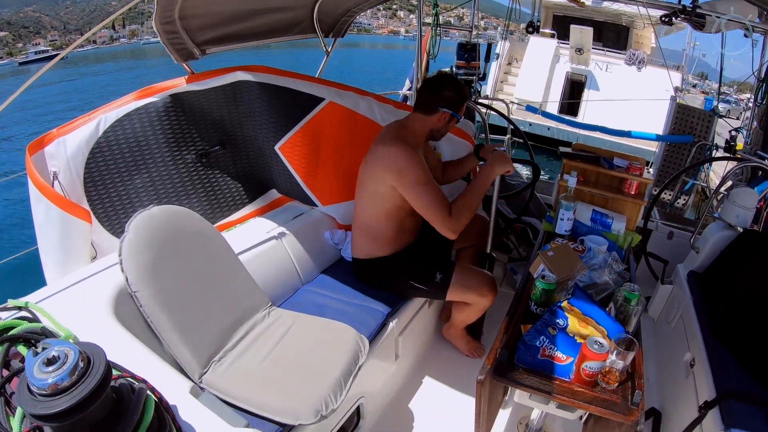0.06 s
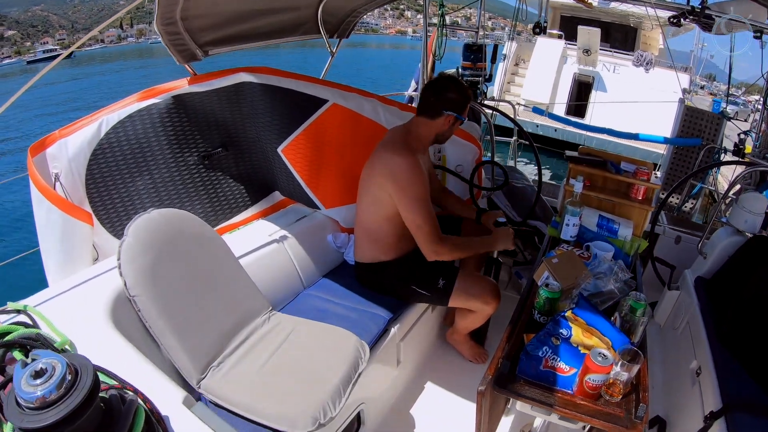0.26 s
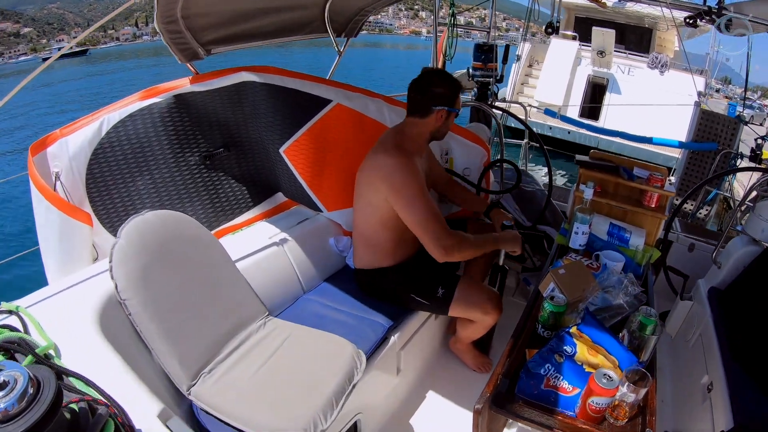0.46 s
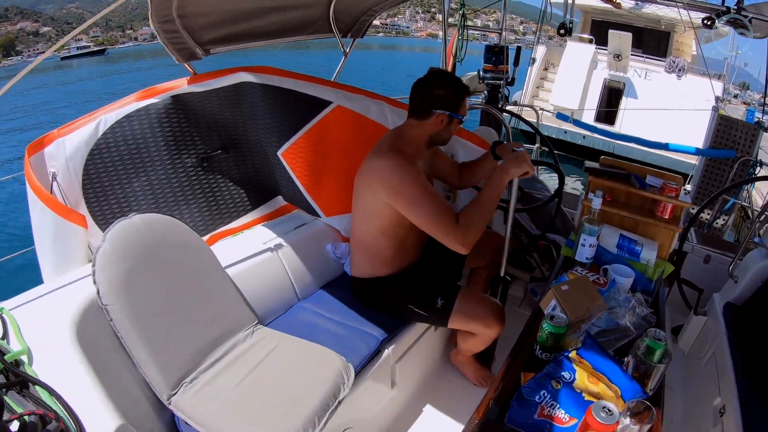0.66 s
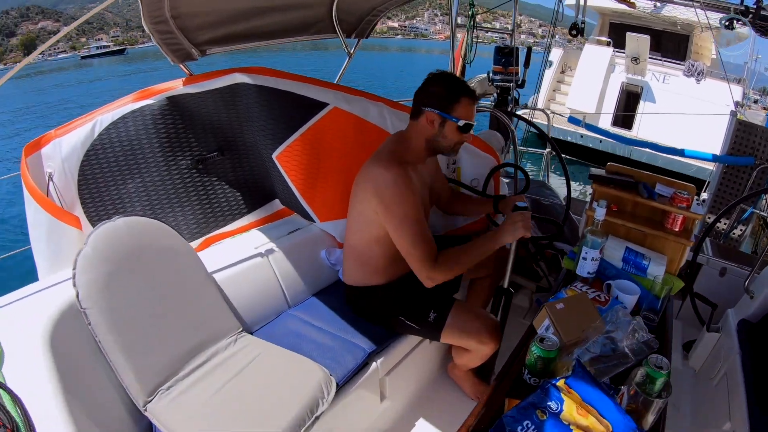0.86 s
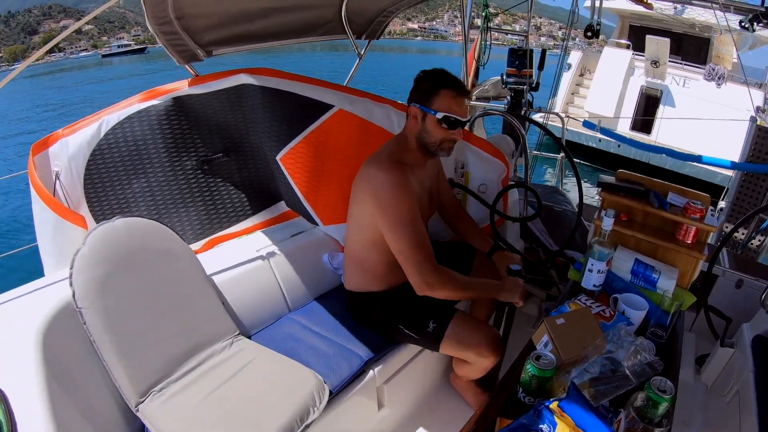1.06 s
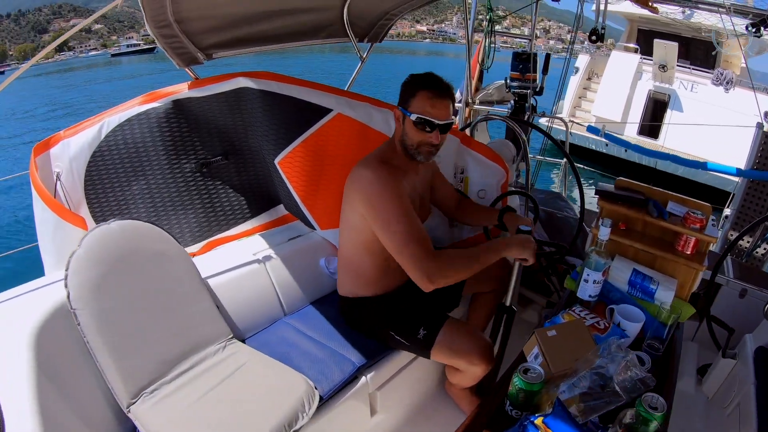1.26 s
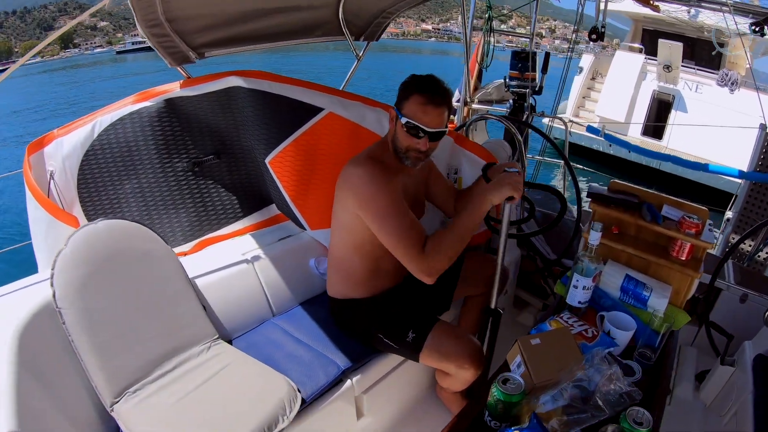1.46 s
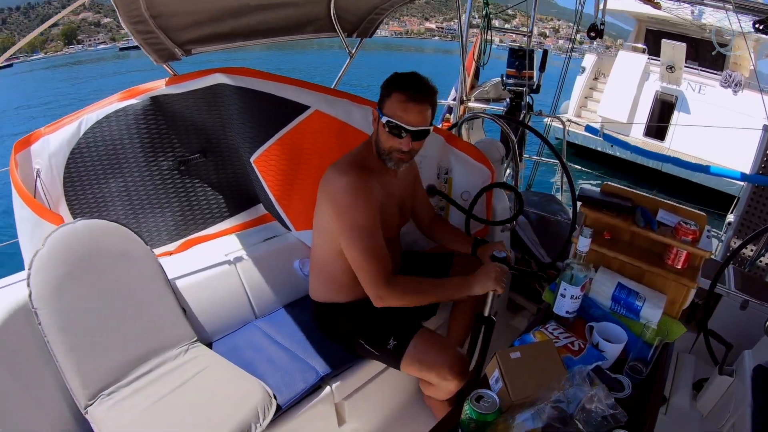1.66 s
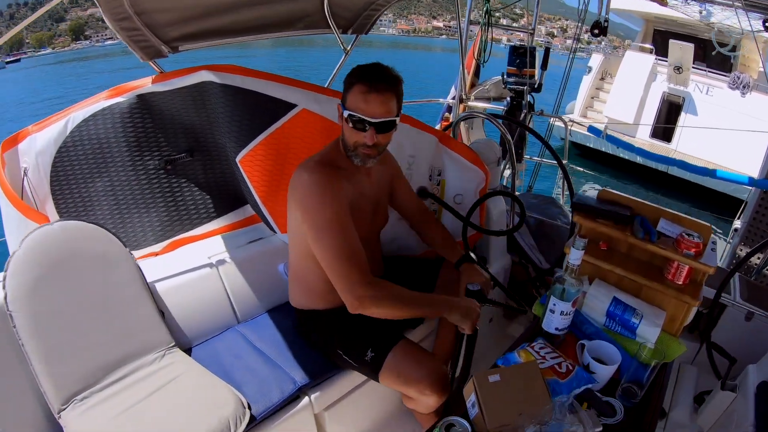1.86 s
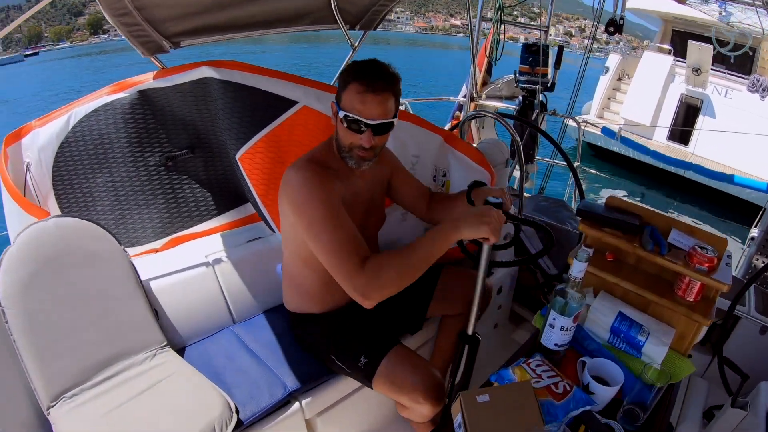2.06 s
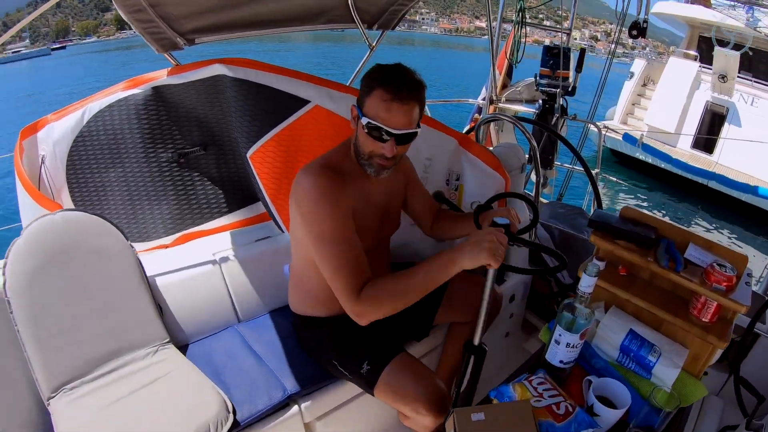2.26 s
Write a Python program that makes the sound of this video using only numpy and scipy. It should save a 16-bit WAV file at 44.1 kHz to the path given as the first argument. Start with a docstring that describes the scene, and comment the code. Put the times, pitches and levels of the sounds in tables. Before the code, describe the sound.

Close outdoor stereo pickup of a manual air pump: a knock, then a breathy squealing push, puff and faint indrawn air, repeated three times with dull thumps, above a steady low engine drone.

```python
"""Hand pump on a boat deck

A hand pump drives air through a ribbed hose into a paddleboard: three pushes of hissing jet noise, each with a
breathy eddy band gliding up and down, upward chirps and a beating whistle of neighbouring tones near 4 kHz.
Squaring and cubing the tones adds overtones. Each pull is a soft swell of noise; knocks are rung body modes with
puffs of noise, thumps are low damped sines. Wavering engine lines hum over harbour noise shaped in bands."""
import sys
import numpy as np
from scipy import signal
from scipy.io import wavfile
from scipy.ndimage import uniform_filter1d

SR = 44100
rng = np.random.default_rng(int(sys.argv[2]) if len(sys.argv) > 2 else 0)


def to_linear_factor(level_db):
    """Convert decibel levels (scalar or array-like) to linear amplitude factors."""
    exponent = np.asarray(level_db, float) / 20
    return 10 ** exponent


def store_pcm(level_fs):
    """Save levels as 16-bit WAV."""
    pcm = np.round(np.clip(level_fs, -1, 1) * 32767).astype(np.int16)
    wavfile.write(sys.argv[1], SR, np.atleast_2d(pcm).T)


N = 101429
T = np.arange(N) / SR  # time in s


def rms_one(x):
    """Scale to rms 1."""
    return x / np.sqrt(np.mean(np.abs(x) ** 2) + 1e-20)


def in_time(rows):
    """Read the columns of a time table along straight lines between its points."""
    s, *columns = np.transpose(rows)
    return [np.interp(T, s, column) for column in columns]


def span(rows):
    """Gate that is one inside the table's time span, with short ramps at its ends."""
    edge_s = 0.012
    nearest_end = np.minimum(T - rows[0][0], rows[-1][0] - T)
    return np.clip(nearest_end / edge_s + 0.5, 0, 1)


def at_hz(points, hz):
    """Read a spectrum on a log-frequency axis."""
    f, value = np.transpose(points)
    return np.interp(np.log(hz), np.log(f), value)


def drift(corner_hz):
    """Slow random wander of rms 1: noise through two equal low-pass poles, drawn at every 40th sample."""
    hop = 40
    r = np.exp(-2 * np.pi * corner_hz * hop / SR)
    noise = rng.standard_normal(N // hop + 2002)
    slow = signal.lfilter([1], [1, -2 * r, r * r], noise)[2000:]  # skip the filter's settling
    return np.interp(np.arange(N) / hop, np.arange(len(slow)), rms_one(slow))


def complex_noise(channels):
    """White noise with independent real and imaginary parts."""
    return rng.standard_normal((channels, N)) + 1j * rng.standard_normal((channels, N))


def low_pass(x, hz):
    """Gentle second-order low-pass."""
    return signal.sosfilt(signal.butter(2, hz, fs=SR, output="sos"), x)


def blur(share, hz, channels):
    """One plus complex low-passed noise: as a factor it spreads a line into a band, power kept."""
    noise = rms_one(low_pass(complex_noise(channels), hz))
    return (1 + share * noise) / np.sqrt(1 + share ** 2)


def banded_noise(spectrum, patchy_db):
    """Third-octave bands of stereo noise, each with its own level, flicker, likeness and lean; rms 1."""
    # how alike left and right are: f/Hz, likeness (1 = identical)
    likeness = [(25, 0.66), (60, 0.86), (150, 1), (360, 0.96), (890, 0.32), (2180, 0.7), (5360, 0.41),
                (13200, 0.056)]
    # stereo lean: f/Hz, left minus right/dB
    lean_table = [(230, -1), (890, -1.2), (13200, -.5)]
    edges = 20 * 2 ** np.arange(0, 9.7, 1 / 3)
    white = rng.standard_normal((2, 2, N))  # neighbouring bands take turns with two noise pairs
    out = 0
    for k, (low, high) in enumerate(zip(edges, edges[1:])):
        hz = np.sqrt(low * high)
        if hz <= spectrum[0][0]:
            continue
        band_filter = signal.butter(2, [low, high], "band", fs=SR, output="sos")
        mid, side = signal.sosfilt(band_filter, white[k % 2])
        alike = at_hz(likeness, hz)
        lean = to_linear_factor(at_hz(lean_table, hz) / 2 * np.array([[1], [-1]]))
        gain = to_linear_factor(at_hz(spectrum, hz) + patchy_db * drift(4.8))
        stereo = np.sqrt(1 + alike) * mid + np.sqrt(1 - alike) * side * [[1], [-1]]
        out = out + gain * lean * stereo
    return rms_one(out)


def tone(hz, db, waver_db):
    """A complex tone that wavers a little in pitch and, by waver_db, in level."""
    waver_hz = 6.87
    turns = np.cumsum(hz + waver_hz * drift(63.6)) / SR + rng.random()
    return np.sqrt(2) * to_linear_factor(db + waver_db * drift(31.0)) * np.exp(2j * np.pi * turns)


def harbour():
    """Harbour bed: steady noise weighted to the lows, flickering gently band by band."""
    # harbour spectrum: f/Hz, relative level per Hz/dB
    spectrum = [(12, -39), (20, -1.5), (80, -0.5), (109, -3.5), (168, -7), (290, -15.5), (515, -22),
                (3120, -32.5), (5100, -43), (7680, -42.5), (10100, -52), (13600, -94)]
    return to_linear_factor(-39.5) * banded_noise(spectrum, patchy_db=1.8)


def hum():
    """Engine lines: a steady part in a narrow band of noise, a little earlier on the left."""
    # engine lines: f/Hz, peak level of the steady part/dB, corner of the wander/Hz
    lines = [(100.3, -42.5, 7.8), (151.8, -46, 5.9)]
    lead = 0.15j * np.array([[1], [-1]])
    out = 0
    for hz, db, width in lines:
        waver = 1 + 0.5 * (drift(width) + 1j * drift(width))
        phase = 2j * np.pi * (hz * T + rng.random()) + lead
        out = out + to_linear_factor(db) * np.real(waver * np.exp(phase))
    return out


def deck(x):
    """Close echoes off deck and hull, each later on the right."""
    # echoes: delay on the left/s, level/dB
    echoes = [(.0043, -22), (0.019, -20)]
    out = x.copy()
    for s, db in echoes:
        for side, stretch in enumerate([1, 1.17]):
            lag = int(s * stretch * SR)
            out[side, lag:] += to_linear_factor(db) * x[side, :-lag]
    return out


def thumps():
    """Dull thumps through the deck: single low modes with a soft attack and a dying ring."""
    # thumps: t/s, level before attack and decay/dB, f/Hz
    hits = [(.928, -21.5, 259.3), (1.534, -21.5, 195)]
    attack_s, t60_s = 0.0094, 0.09
    out = 0
    for s, db, hz in hits:
        age = np.maximum(T - s, 0)
        envelope = to_linear_factor(db - 60 * age / t60_s) * np.tanh(age / attack_s) ** 2
        out = out + envelope * np.sin(2 * np.pi * hz * age)
    return out


def knocks():
    """Piston and handle knocks: each rings the pump body briefly and lets out a dying puff of air."""
    # knocks: t/s, thud level/dB, puff level/dB
    hits = [(0.014, -33.5, -42), (0.483, -57, -40), (0.719, -33.5, -45), (0.798, -42, -55),
            (1.227, -39.5, -39), (1.441, -31, -45), (1.519, -41, -45), (1.935, -35.5, -34),
            (2.18, -32, -49), (2.258, -70.5, -44.5)]
    # pump body modes: f/Hz, relative level/dB, t60/s
    body = [(187, -1, 0.025), (276, 3.5, 0.044), (410, -3, 0.06), (660, -7.5, 0.038), (843, -9, 0.025),
            (1350, -13, 0.029), (2320, -12, 0.014)]
    # puff spectrum: f/Hz, relative level per Hz/dB
    puff_spectrum = [(300, 15), (800, 1), (1500, -1.5), (3000, 2.5), (5000, -8), (9000, -19), (14000, -49)]
    thud_attack_s, puff_attack_s, puff_t60_s = 0.0018, 0.0078, 0.081
    mode_offsets_db = rng.normal(0, 1.5, (len(hits), len(body)))  # no two knocks ring alike
    thud, puff = 0, 0
    for (s, thud_db, puff_db), offsets in zip(hits, mode_offsets_db):
        age = np.maximum(T - s, 0)
        attack = np.tanh(age / thud_attack_s)
        for (hz, mode_db, t60), offset_db in zip(body, offsets):
            decay = to_linear_factor(thud_db + mode_db + offset_db - 60 * age / t60)
            thud = thud + decay * attack * np.sin(2 * np.pi * hz * age)
        puff = puff + to_linear_factor(puff_db - 60 * age / puff_t60_s) * np.tanh(age / puff_attack_s)
    return thud + puff * banded_noise(puff_spectrum, patchy_db=1.0)


def intake_air():
    """Soft swell of intake air on each pull: shaped noise under a bell-like envelope."""
    # pulls: loudest t/s, half length/s, level/dB
    pulls = [(0.657, 0.059, -55), (1.38, 0.092, -53), (2.104, 0.076, -53)]
    # intake spectrum: f/Hz, relative level per Hz/dB
    spectrum = [(1200, -7), (2000, -6), (3100, 0), (5500, -13), (8000, -0.5), (10000, -17.5), (13600, -26)]
    swell = sum(to_linear_factor(db) * np.exp(-((T - s) / half) ** 2) for s, half, db in pulls)
    return swell * banded_noise(spectrum, patchy_db=4.5)


def jet_hiss():
    """Broad hiss of the air jet: shaped noise that follows a level curve on each push."""
    # jet level, one table per push: t/s, level before the common boost/dB
    flow = [
        [(.12, -86), (.15, -62.5), (.18, -55.5), (.245, -48), (.28, -50.5), (.39, -56.5), (.47, -89)],
        [(.83, -90), (.86, -61.5), (.895, -50), (.96, -44.5), (1.09, -53), (1.16, -64), (1.21, -80)],
        [(1.56, -80), (1.59, -62.5), (1.62, -49), (1.675, -48.5), (1.72, -53.5), (1.82, -51), (1.88, -63.5),
         (1.92, -73)],
    ]
    # jet spectrum: f/Hz, relative level per Hz/dB
    spectrum = [(410, -36), (700, -9.5), (1080, -3), (1390, -7.5), (2810, 2), (3790, -5), (4680, -11.5),
                (5230, -17.5), (6310, 4.5), (13600, -32)]
    boost_db = 6.5
    level = sum(span(rows) * to_linear_factor(in_time(rows)[0] + boost_db) for rows in flow)
    return level * banded_noise(spectrum, patchy_db=3.5)


def eddies():
    """Noise shifted up to the eddy rate, which follows the air speed: a gliding breathy band."""
    # eddy rate and strength: t/s, f/Hz, relative level/dB
    eddy_curve = [(.15, 2258, -90), (.2, 2993, -59), (.25, 3980, -48), (.33, 3957, -52), (.39, 3370, -50),
                  (.43, 2707, -52.5), (.47, 2286, -74), (.85, 2400, -88), (.89, 2828, -66),
                  (.97, 4028, -37), (1.03, 3910, -52), (1.1, 3300, -42), (1.15, 2573, -56),
                  (1.2, 2318, -68), (1.58, 2204, -73), (1.63, 2792, -56.5), (1.69, 3800, -41),
                  (1.78, 3785, -44.5), (1.83, 3203, -43.5), (1.88, 2676, -55.5), (1.93, 2390, -73)]
    band_width_hz, boost_db = 760, 3.5
    hz, db = in_time(eddy_curve)
    noise = complex_noise(2)
    mostly_shared = noise + 3.7 * noise[0]  # the left noise is heard on both sides
    band = rms_one(low_pass(mostly_shared, band_width_hz / 2))
    return to_linear_factor(db + boost_db) * band * np.exp(2j * np.pi * np.cumsum(hz) / SR)


def chirps():
    """The jet's edge tone gliding upward while the air speeds up, blurred until mostly noise."""
    # chirps: loudest t/s, half length/s, f at the loudest/Hz, rise/Hz per s, level/dB
    glides = [(0.182, 0.016, 4520, 12000, -51), (.215, 0.062, 6240, 2180, -52.5),
              (0.886, .014, 5950, 24000, -48.5), (1.63, 0.042, 6430, 7910, -51),
              (1.665, 0.017, 5690, 10860, -45), (1.754, .022, 4130, 9000, -46)]
    out = 0
    for s, half, hz, rise, db in glides:
        pitch = hz + rise * np.clip(T - s, -2 * half, 2 * half)
        glide = np.real(tone(pitch, db, 0) * blur(2.5, 260, channels=2))
        out = out + glide * np.exp(-((T - s) / half) ** 4)
    return out


def hose_tones():
    """Singing hose resonances, as a group that breeds overtones and a group that does not."""
    # the two loudest whistling resonances, one table per push: t/s, f/Hz, level/dB
    low_whistle = [
        [(.22, 3924, -52), (.24, 3897, -33.5), (.256, 3873, -19.5), (.28, 3880, -28.5), (.31, 3860, -22.5),
         (.345, 3864, -18), (.37, 3868, -24), (.39, 3860, -37), (.41, 3845, -67.5)],
        [(.945, 3878, -50), (.965, 3878, -29.5), (.981, 3872, -30), (1.0, 3860, -40), (1.03, 3860, -35),
         (1.05, 3862, -50)],
        [(1.67, 3892, -50), (1.686, 3884, -24.5), (1.7, 3881, -22), (1.74, 3875, -23.5), (1.785, 3860, -28.5),
         (1.805, 3864, -37), (1.86, 3880, -57.5), (1.95, 3890, -60)],
    ]
    high_whistle = [
        [(.245, 3995, -44), (.262, 3994, -24), (.3, 3963, -26.5), (.335, 3965, -30.5), (.365, 3925, -41),
         (.39, 3960, -58), (.5, 3970, -68.5)],
        [(.93, 3988, -55), (.966, 3959, -32), (.985, 3957, -25.5), (1.008, 3950, -32.5), (1.035, 3970, -20),
         (1.06, 3950, -22.5), (1.085, 3934, -34.5), (1.11, 3956, -44), (1.14, 3963, -56.5), (1.29, 4000, -73)],
        [(1.66, 3960, -48), (1.682, 3971, -28.5), (1.703, 3980, -24), (1.72, 3963, -43), (1.74, 3994, -42),
         (1.77, 3955, -33.5), (1.79, 3947, -36), (1.81, 4040, -56)],
    ]
    # brief resonances: start t/s, loudest t/s, t whose distance from the loudest sets the fall/s,
    # f at the loudest/Hz, level at the loudest/dB
    brief_notes = [(1.643, 1.665, 1.69, 5320, -48), (0.867, .885, 1.05, 2790, -49),
                   (1.2197, 1.223, 1.229, 2960, -41.5), (0.199, 0.224, 0.25, 3410, -41.5),
                   (0.204, 0.257, 0.39, 3664, -40.5), (0.226, 0.252, 0.38, 4200, -39),
                   (0.239, .262, 0.33, 4284, -27), (0.388, 0.418, 0.47, 2780, -48.5),
                   (0.899, .94, 1.1, 3270, -47.5), (0.951, 1.0, 1.097, 3615, -41),
                   (0.943, .972, 1.055, 4190, -34.5), (0.946, .98, 1.104, 4310, -41.5),
                   (0.945, .972, 1.07, 3807, -34), (1.042, 1.09, 1.138, 3340, -37),
                   (1.059, 1.1, 1.14, 3510, -41), (1.09, 1.14, 1.17, 2780, -42.5),
                   (1.101, 1.14, 1.17, 2670, -44), (1.13, 1.16, 1.181, 2440, -43),
                   (1.618, 1.633, 1.87, 2890, -62), (1.66, 1.7, 1.68, 3670, -38.5),
                   (1.67, 1.74, 1.83, 4400, -47), (1.712, 1.775, 1.86, 3766, -37),
                   (1.83, 1.862, 1.9, 2720, -52), (1.834, 1.859, 1.905, 2830, -46.5), ]
    # range of the brief notes that breed overtones: lowest f/Hz, highest f/Hz
    breeding_range = (3600, 4800)
    rise_db, fall_db, sag_hz_per_s = 14, 14, 150  # rise and fall: dB below the peak one interval away
    port_spread = 0.72  # spread of the random phase on each side, rad
    breeding, plain = 0, 0
    for rows in low_whistle + high_whistle:
        breeding = breeding + span(rows) * tone(*in_time(rows), 1.53)
    for start, top, fall_mark, hz, db in brief_notes:
        rise = rise_db * ((T - top) / (top - start)) ** 2
        fall = fall_db * ((T - top) / (fall_mark - top)) ** 2  # squared: only the interval's size counts
        below_peak_db = np.minimum(np.where(T < top, rise, fall), 200)
        note = tone(hz - sag_hz_per_s * (T - top), db - below_peak_db, 0)
        note = note * blur(0.85, 60, channels=1)  # partly noise
        note = note * np.exp(1j * port_spread * rng.standard_normal((2, 1)))
        if breeding_range[0] < hz < breeding_range[1]:
            breeding = breeding + note
        else:
            plain = plain + note
    return breeding, plain


def whistle(breath):
    """Hose tones with their square and cube as overtones, each with its own balance and phase lead."""
    # overtone levels, one table per push: t/s, relative octave level/dB, relative twelfth level/dB
    overtones = [
        [(0.22, -45.5, -71), (0.286, -23, -56), (0.334, -32, -55), (0.45, -60.5, -99)],
        [(0.93, -45, -84), (0.988, -18.5, -50), (1.032, -26, -53.5), (1.2, -66.5, -106)],
        [(1.66, -54, -75), (1.692, -23, -56.5), (1.732, -20.5, -51), (1.88, -56.5, -85)],
    ]
    # turbulence around the octave, then the twelfth: noise share, low-pass corner/Hz
    fuzz = [(.35, 238), (1.0, 500)]
    # stereo place, one row per push: left minus right/dB, left lead/rad; for whistle, octave and twelfth
    places = [(-2, 0.3, -1.3, 1.48, 0, 1), (-1.5, 0.76, -1.3, 1.17, 0.019, 1.2),
              (-1, 0.37, -0.69, 1.29, 0, 1.1)]
    # times at which the next push's stereo place takes over: t/s
    push_borders = [.65, 1.4]
    breath_share, squeeze = 0.22, 0.36  # breath in the overtones; flattening of the beats
    breeding, plain = hose_tones()
    rough = breeding + breath_share * breath
    local_power = uniform_filter1d(np.abs(rough) ** 2, size=1300)
    even = rough / np.sqrt(local_power + 1e-9)
    even = even / (np.abs(even) + 1e-6) ** squeeze
    octave_level = sum(span(rows) * to_linear_factor(in_time(rows)[0]) for rows in overtones)
    twelfth_level = sum(span(rows) * to_linear_factor(in_time(rows)[1]) for rows in overtones)
    octave = octave_level * even ** 2 * blur(*fuzz[0], channels=2)
    twelfth = twelfth_level * even ** 3 * blur(*fuzz[1], channels=2)
    place = np.array(places)[np.searchsorted(push_borders, T)].T
    sides = np.array([[0.5], [-0.5]])
    out = 0
    for k, part in enumerate([breeding + plain, octave, twelfth]):
        balance = to_linear_factor(sides * place[2 * k])
        lead = np.exp(1j * sides * place[2 * k + 1])
        out = out + np.real(part * balance * lead)
    return out


def scene():
    """Pump and hose on deck over the harbour; eddies, knocks and thumps also echo off the deck."""
    background = harbour() + hum()
    breath = eddies()
    on_deck = deck(np.real(breath) + knocks() + thumps())
    moving_air = intake_air() + jet_hiss() + chirps()
    return background + on_deck + moving_air + whistle(breath)


def roll_off(x):
    """The treble ends steeply here."""
    return signal.sosfilt(signal.butter(12, 13770, fs=SR, output="sos"), x)


def record(dry):
    """Deliver the finished mix."""
    return roll_off(dry)


dry = scene()
out = record(dry)
store_pcm(out)
```